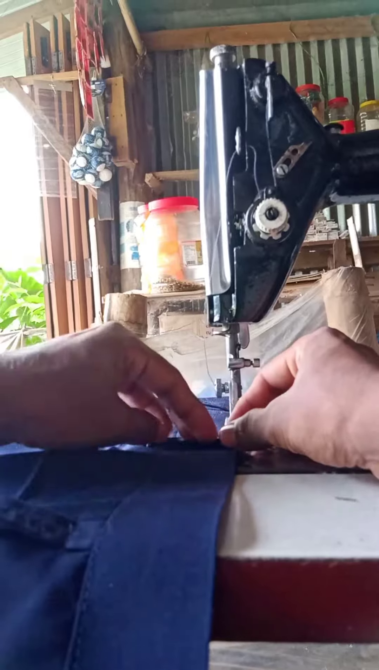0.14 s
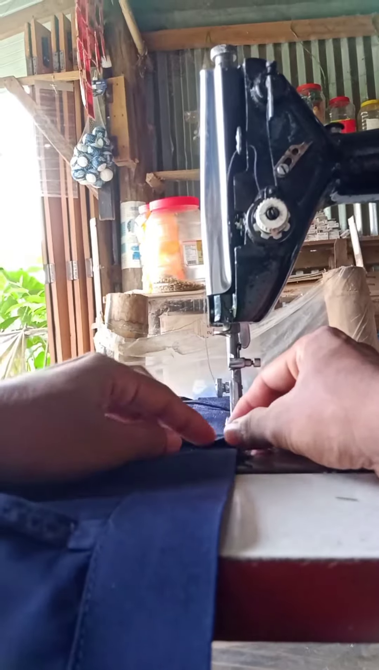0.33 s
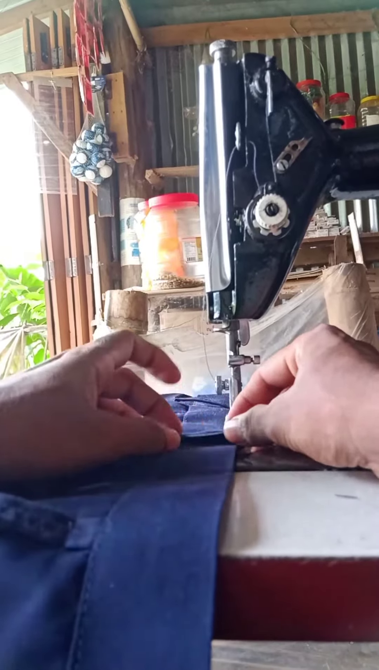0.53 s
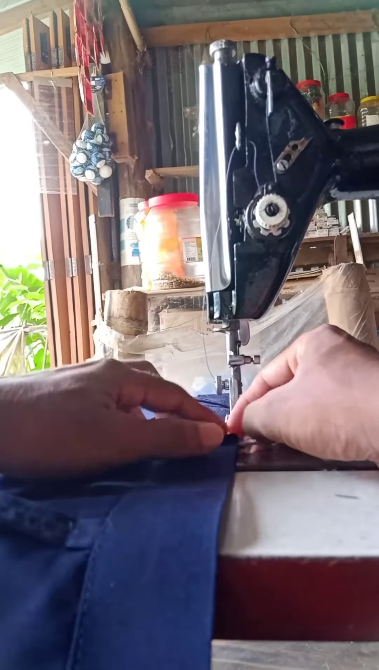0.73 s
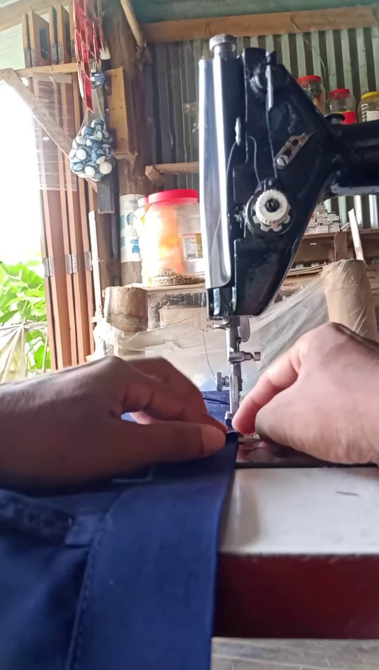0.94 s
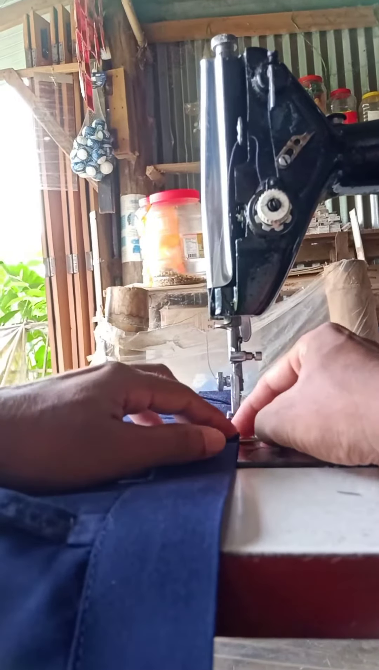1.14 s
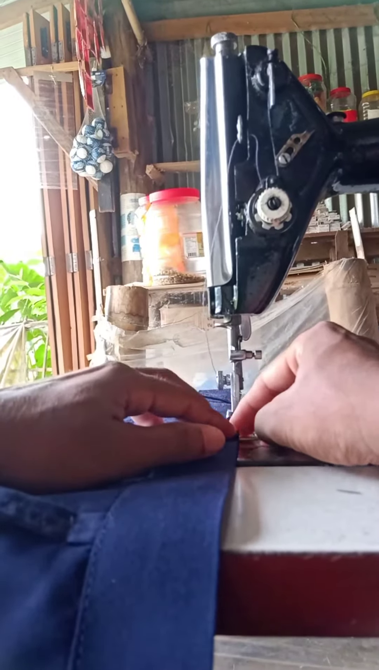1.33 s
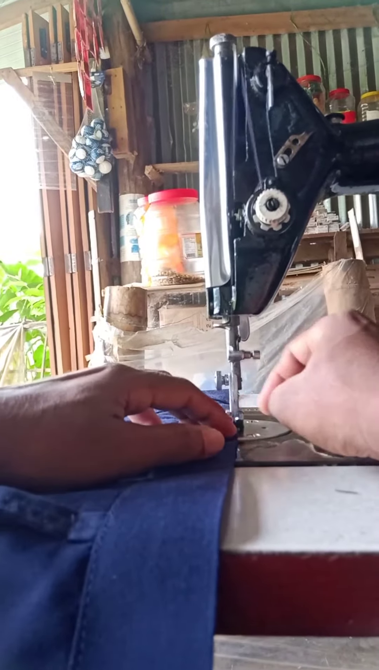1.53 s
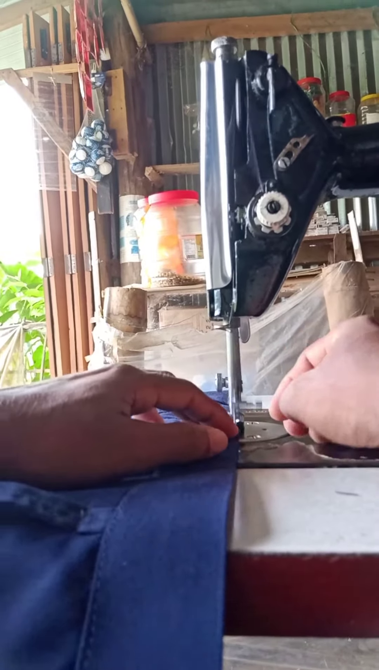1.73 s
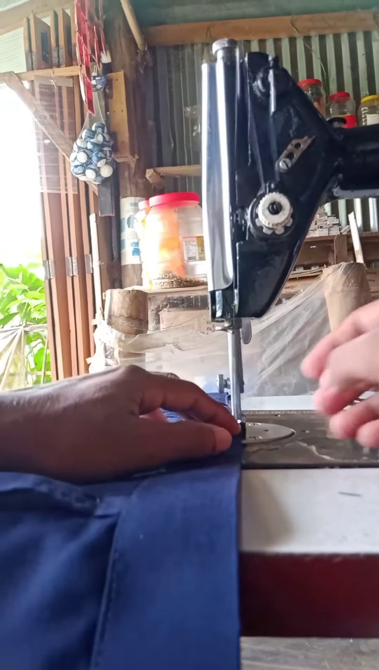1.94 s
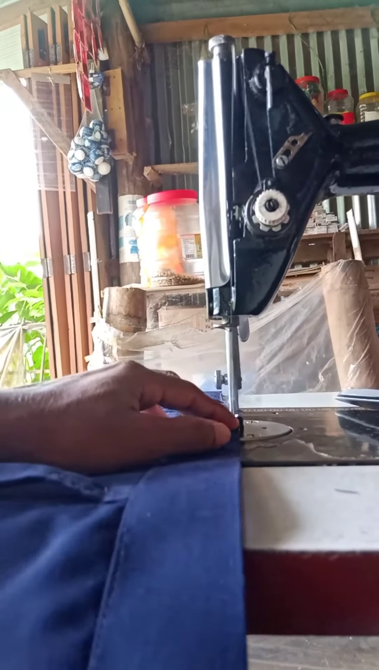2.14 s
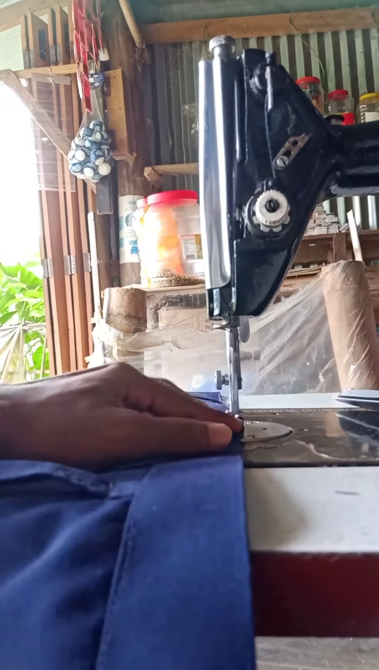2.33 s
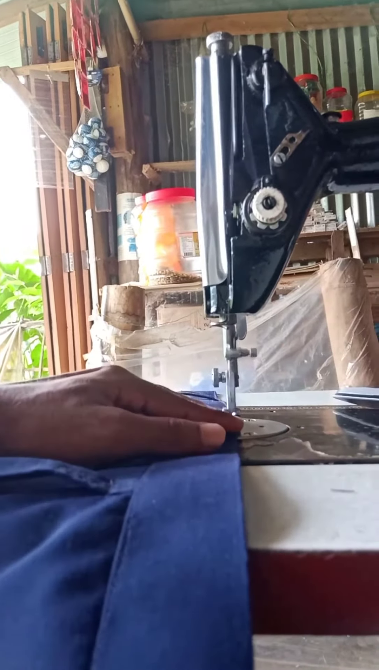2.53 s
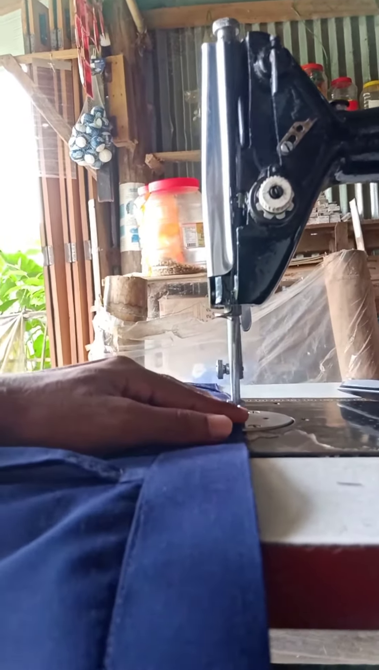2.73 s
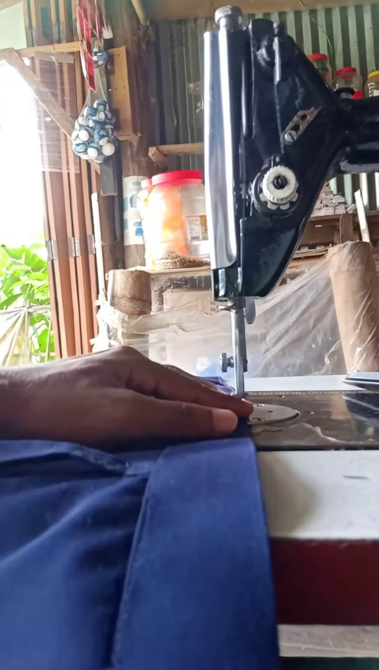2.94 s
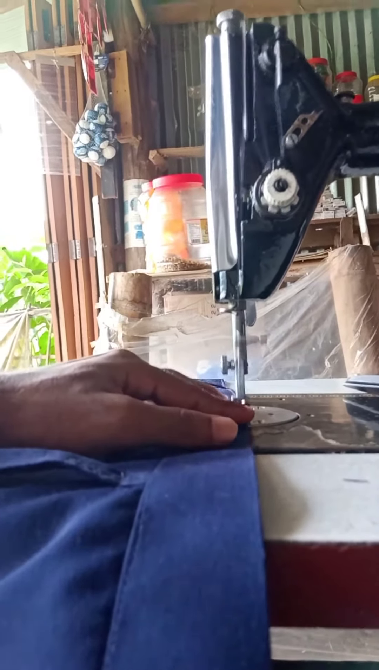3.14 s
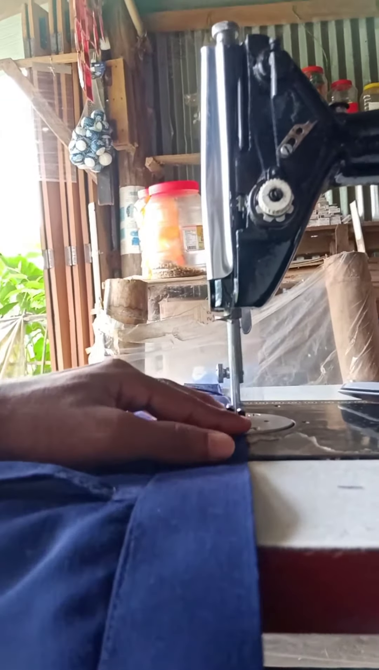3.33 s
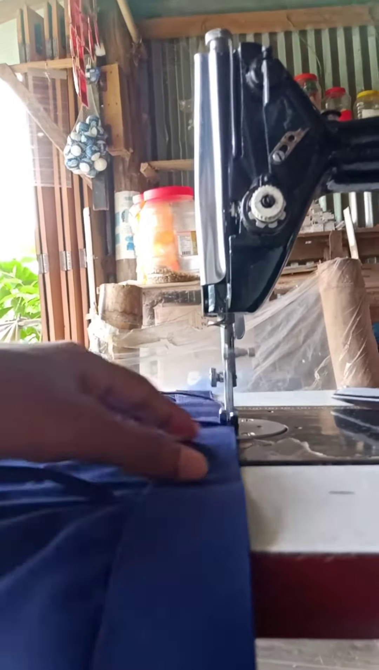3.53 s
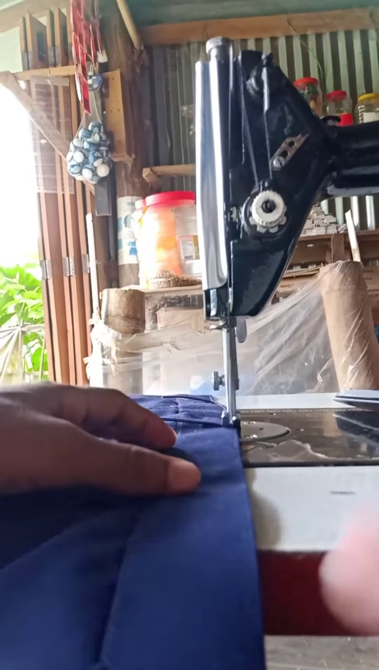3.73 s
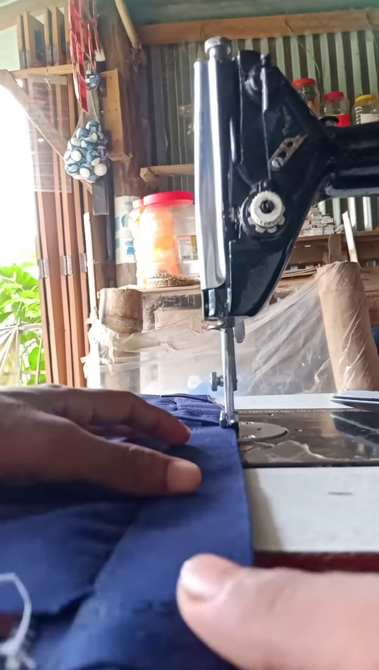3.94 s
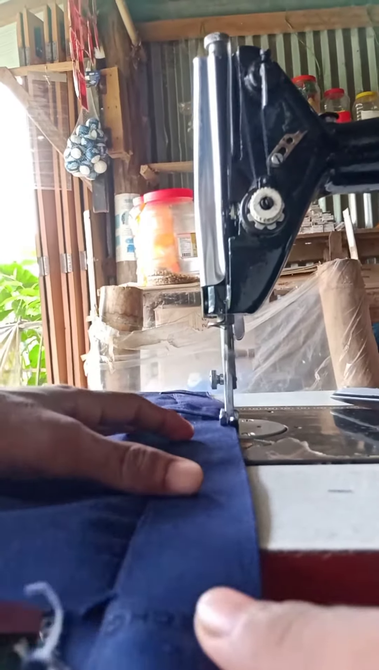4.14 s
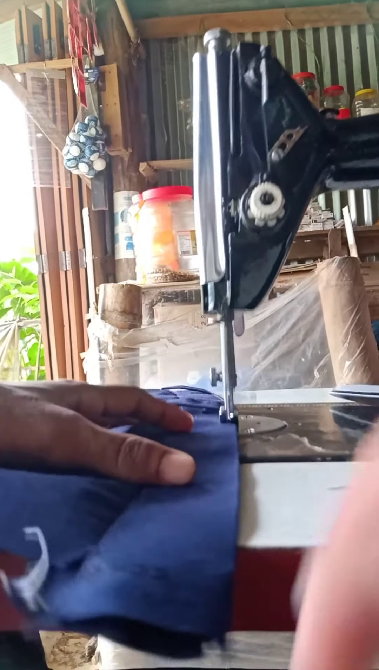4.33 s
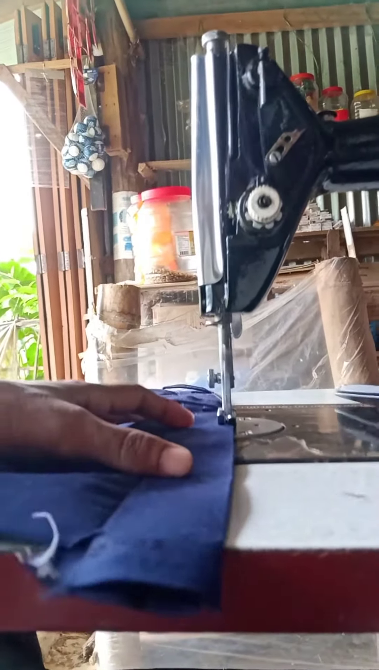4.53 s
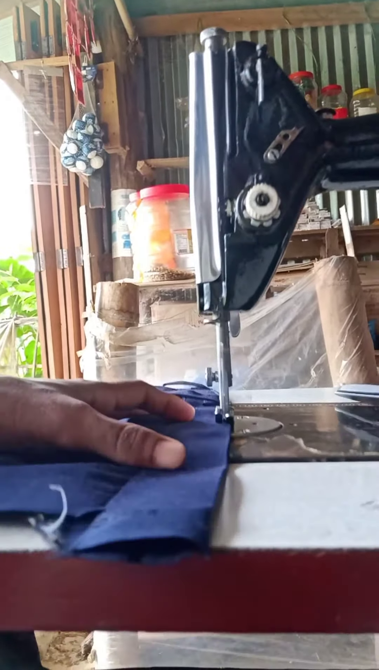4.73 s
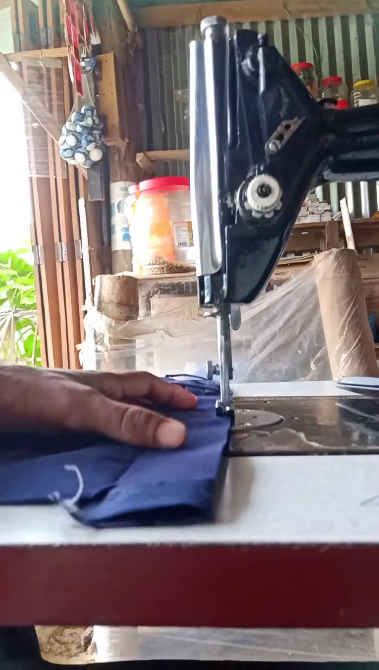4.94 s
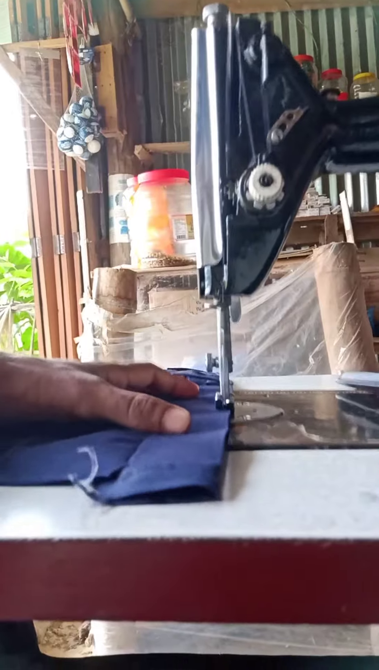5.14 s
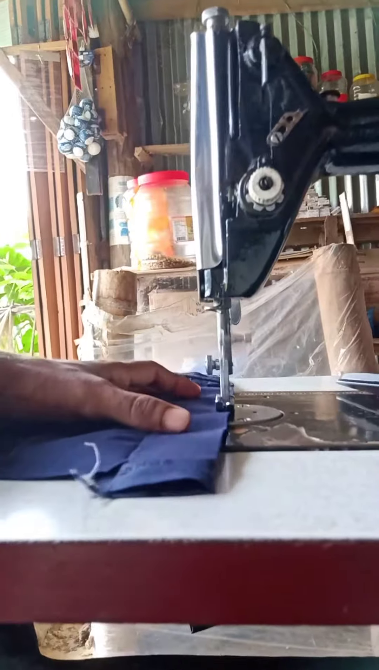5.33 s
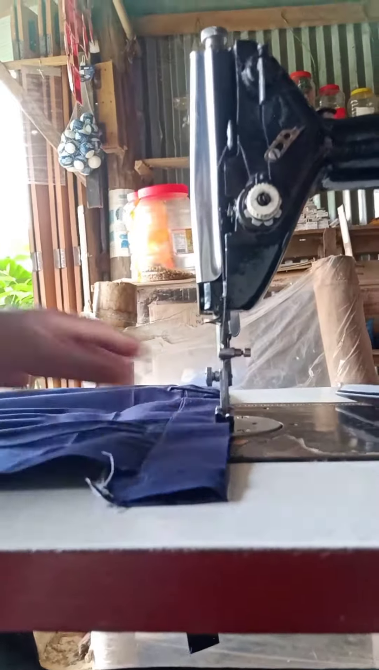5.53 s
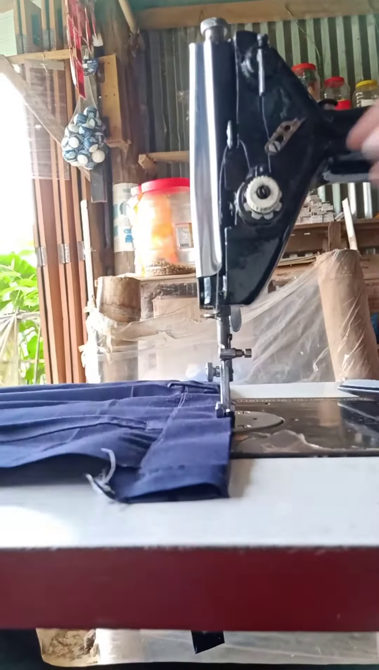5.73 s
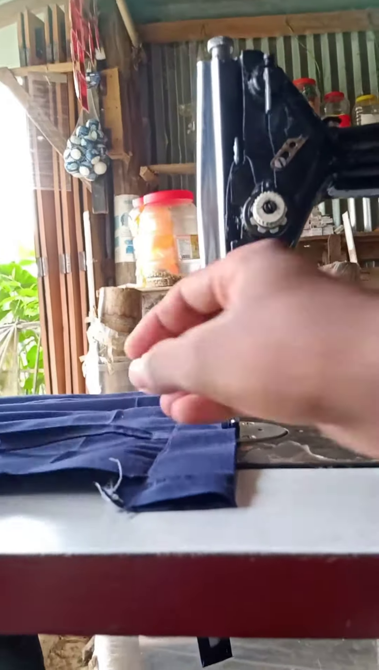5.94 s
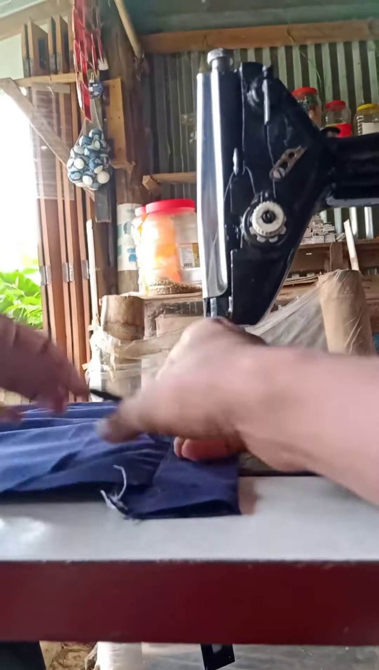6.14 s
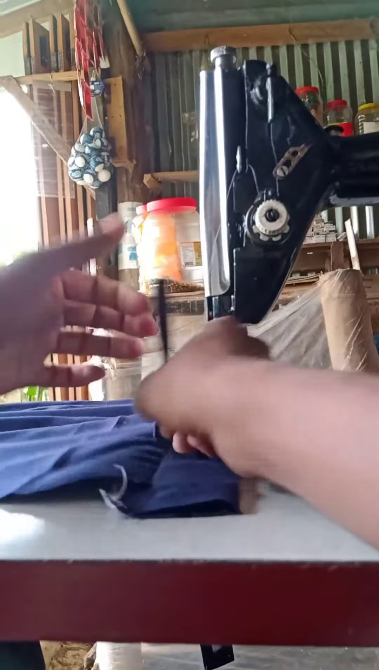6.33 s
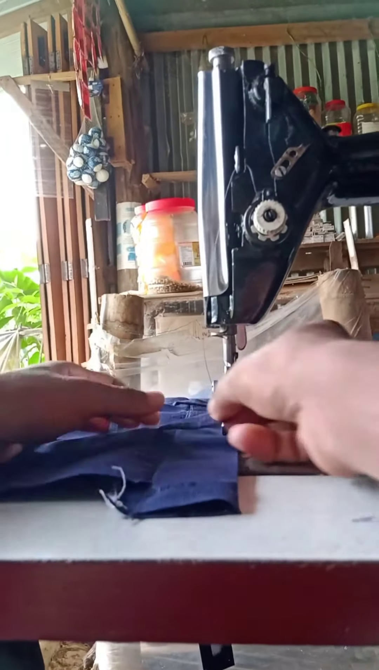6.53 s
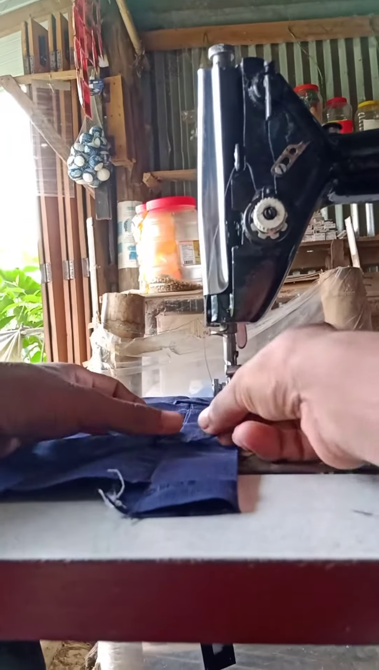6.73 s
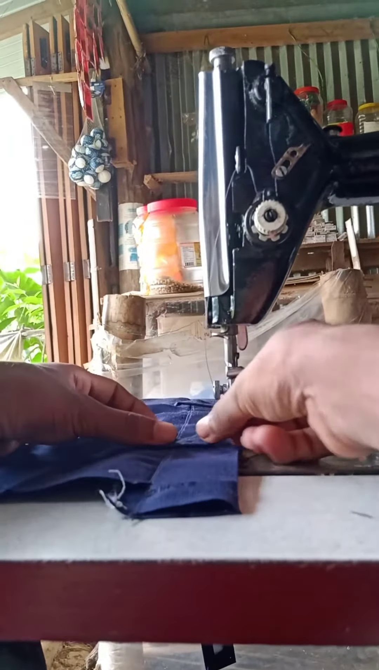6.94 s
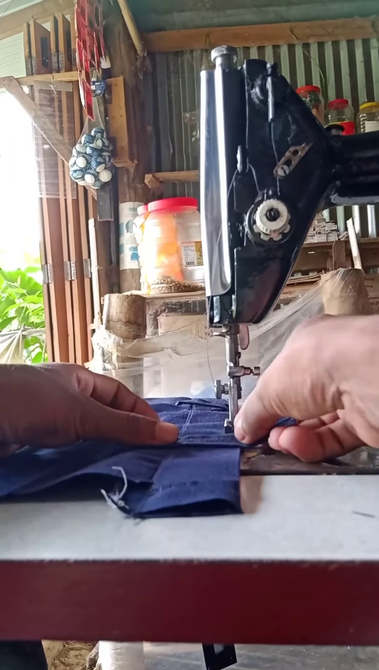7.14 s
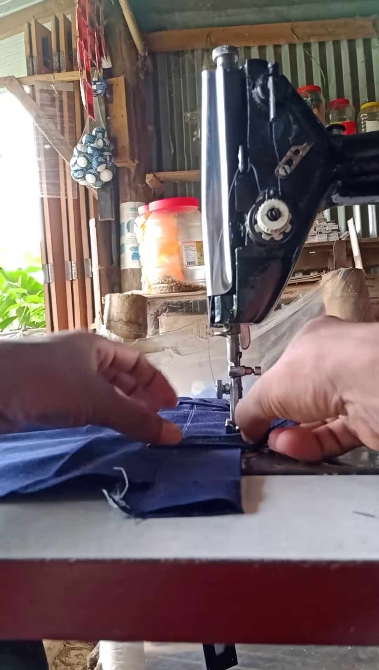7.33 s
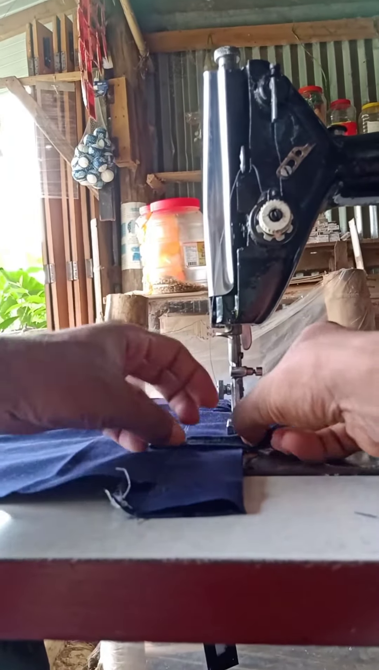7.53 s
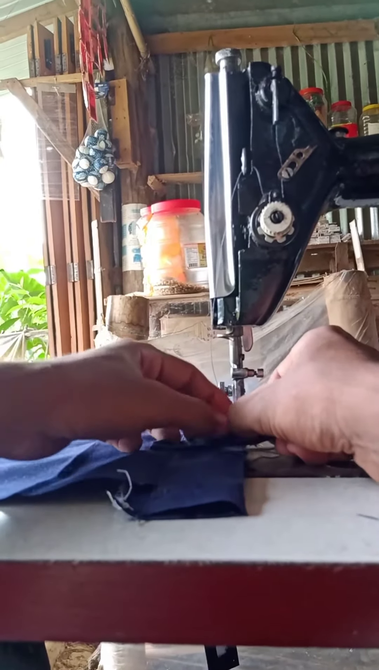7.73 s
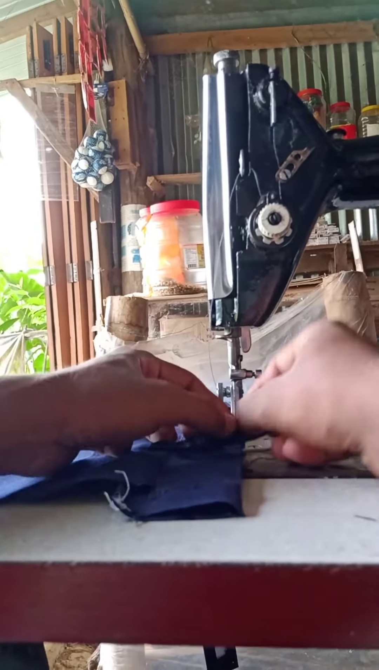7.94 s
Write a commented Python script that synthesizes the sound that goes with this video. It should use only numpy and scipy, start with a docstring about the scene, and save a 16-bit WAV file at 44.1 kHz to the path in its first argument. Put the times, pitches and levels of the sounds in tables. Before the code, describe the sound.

Close microphone beside an old motor-driven sewing machine on a wooden table. Constant wavering fan tone and airy rush come first alone. Then hard metallic clatter, ringing casting, thread ticks and whirring bearings run for four seconds in three speed surges, the belt singing briefly under load. Loud stitching ducks the hum; after the stop it gradually returns. Short, tight room reverberation.

```python
"""Small tin-walled workshop: a motor-driven cast-iron sewing machine on a wooden table, close to the microphone.
A fan hums and rushes steadily, as wavering tones over coloured noise; the machine sews in three surges of speed.
Each turn of the shaft strikes six blows that ring casting, steel and frame; the thread ticks and hisses, bearings whirr.
The belt sings in bending tones under load, and the dry works squeak in rough short notes at the start.
The recorder's gain control pushes loud passages down and lets the sound swell back."""
import sys
import numpy as np
from scipy import signal
from scipy.fft import rfft, irfft
from scipy.io import wavfile
from scipy.ndimage import uniform_filter1d

SR = 44100
rng = np.random.default_rng(int(sys.argv[2]) if len(sys.argv) > 2 else 0)


def generate_wav(signal):
    """Clip the signal to [-1, 1] and save it as 16-bit WAV at the path in sys.argv[1]."""
    frames = np.transpose(np.atleast_2d(signal))
    scaled = np.clip(frames, -1, 1) * 32767
    pcm = np.round(scaled).astype(np.int16)
    wavfile.write(sys.argv[1], SR, pcm)


N = 351918
TIME = np.arange(N) / SR
SHORT_TIME = TIME[:SR // 2]  # the half second given to every decay


def undb(db):
    """Turn decibels into gain."""
    return 10 ** (np.asarray(db) / 20)


def unit(x):
    """Scale to rms 1."""
    return x / np.sqrt(np.mean(x ** 2))


def filter_unit_energy(x, response):
    """Convolve with a response scaled to unit energy."""
    return signal.fftconvolve(x, response / np.linalg.norm(response))[:N]


def colour(x, points):
    """Minimum-phase filter of unit energy whose spectrum follows (Hz, dB) points."""
    hz, db = np.transpose(points)
    size = 8192
    grid = np.maximum(np.fft.rfftfreq(size, 1 / SR), 1)
    gain = undb(np.interp(np.log(grid), np.log(hz), db))
    # folding the cepstrum forward in time makes the filter causal
    cepstrum = irfft(np.log(gain))
    cepstrum[1:size // 2] *= 2
    cepstrum[size // 2 + 1:] = 0
    return filter_unit_energy(x, irfft(np.exp(rfft(cepstrum))))


def walk(rate):
    """Smooth random wander of rms 1; a higher rate wanders faster."""
    width = int(SR / rate)
    steps = rng.standard_normal(N // 20)[np.arange(N) // max(width, 20)]
    return unit(uniform_filter1d(uniform_filter1d(steps, width), width))


def fade(t60):
    """Half a second of exponential decay, 60 dB down after t60 seconds."""
    return np.exp(-np.log(1000) * SHORT_TIME / t60)


def ring(x, modes):
    """Struck parts ring as a sum of decaying sines, scaled to unit energy."""
    response = np.zeros(len(SHORT_TIME))
    for k, (hz, t60, db) in enumerate(modes):
        sign = (-1) ** k  # neighbouring modes move in opposite directions
        response += sign * undb(db) * fade(t60) * np.sin(2 * np.pi * hz * SHORT_TIME)
    return filter_unit_energy(x, response)


def blows(times, db):
    """One impulse of the given size at each time."""
    samples = np.clip(times * SR, 0, N - 1).astype(int)
    return np.bincount(samples.ravel(), undb(db).ravel(), N)


def push(x, length_s):
    """Spread each blow over a soft contact."""
    size = int(length_s * SR) | 1
    window = np.hanning(size)
    return signal.fftconvolve(x, window / window.sum(), "same")


def chatter(x, t60, rise_s):
    """Each blow breaks up into a burst of tiny random contacts that builds and fades."""
    power = (fade(t60) * (1 - np.exp(-SHORT_TIME / rise_s))) ** 2
    burst_power = signal.fftconvolve(x ** 2, power / power.sum())[:N]
    return np.sqrt(np.abs(burst_power)) * rng.standard_normal(N)


def swell(start, length):
    """A rounded rise and fall."""
    return np.sin(np.pi * np.clip((TIME - start) / length, 0, 1))


def tone(hz):
    """A sine of rms 1 that follows a pitch curve from a random phase."""
    return np.sqrt(2) * np.sin(2 * np.pi * (np.cumsum(hz) / SR + rng.random()))


# Tones of the fan motor. Each row: pitch in Hz, rms level in dB, unsteadiness (a relative amount).
FAN_TONES = [(86, -53, 0.5), (96, -47.5, 6.5), (301, -42.5, 0), (509.5, -53, 4.5), (564, -47, 4.5),
             (594, -50.5, 0.5), (599.3, -23, 0.94), (625.5, -38, 1.06), (669, -53.5, 0), (865, -49.5, 4.5),
             (889, -44, 4), (958, -48, 2.5), (1680, -53, 3.5), (1730, -46.5, 5.5)]
# Rush of air from the fan. Each row: frequency in Hz, relative level in dB.
FAN_AIR = [(25, -22.5), (50, -2.5), (90, 5), (150, 4), (230, -3), (400, 4.5), (950, 4), (1300, -0.5),
           (1720, 0.5), (1900, -3.5), (3300, -14), (4300, -31), (5500, -53.5), (15000, -58)]


def fan(air_db=-34.0, drift=.0003, flutter_hz=1.0, waver_db=0.63):
    """Motor tones waver in level and pitch, each by its own unsteadiness, over rushing air."""
    hum = np.zeros(N)
    for hz, db, unsteadiness in FAN_TONES:
        level = undb(db + waver_db * unsteadiness * walk(22))
        pitch = hz * (1 + drift * walk(2)) + flutter_hz * unsteadiness * walk(25)
        hum += level * tone(pitch)
    air = colour(rng.standard_normal(N), FAN_AIR)
    return hum + undb(air_db + 0.53 * walk(14)) * air


# Speed of the shaft, one stitch a turn, in three surges from rest to rest.
# Each row: time in seconds, speed in turns a second.
SHAFT_SPEED = [(1.56, 0), (1.64, 12.0), (1.83, 16.05), (2.13, 14.94), (2.46, 11.4), (2.73, 7.69),
               (2.96, 15.1), (3.16, 21.31), (3.59, 15.68), (3.85, 13.36), (3.94, 10.8), (4.22, 18.06),
               (4.59, 23.5), (4.94, 31.72), (5.35, 21.75), (5.46, 16.32), (5.63, 0)]
CRUISE_HZ = 18  # turns a second at which the blows have their listed strength


def shaft():
    """The motor turns the shaft; its speed glides between the listed points."""
    return np.interp(TIME, *np.transpose(SHAFT_SPEED))


# How hard the works are driven, apart from their speed.
# Each row: time in seconds, knock level in dB, click level in dB.
DRIVE_LOAD = [(1.56, -17, -24), (1.66, -9.5, -13.5), (1.85, -3.5, 1.5), (2.11, -4.5, -1.5), (2.5, 2, -1),
              (2.95, -3, -1), (3.25, 3, 4), (3.85, -3.5, -1), (4.14, -3.5, -4.5), (4.31, 1.5, 5),
              (4.45, 6, 5.5), (4.8, 4.5, 2), (5.0, 0, -0.5), (5.36, 3, -5.5), (5.48, -1, -0.5),
              (5.561, -11, -15)]


def load(times):
    """Extra strength of the knocks and of the clicks at these times, in dB."""
    load_s, knock_db, click_db = np.transpose(DRIVE_LOAD)
    return np.interp(times, load_s, knock_db), np.interp(times, load_s, click_db)


# Blows of needle bar, feed and shuttle within one turn. Each row: share of the turn, knock level in dB,
# click level in dB, click gain in dB per doubling of speed.
CAM_BLOWS = [(.02, 2, 2.5, 2.5), (.13, 6, -8.5, 16), (0.299, 0, -2.5, 22), (.61, 2, 3.5, 5.5),
             (0.719, 1.5, -7, 7), (.84, 1, 1.5, 5)]


def strikes(slop_s=0.00069):
    """Times of every cam blow, and the shaft speed in doublings above cruising; one row a stitch."""
    rate = shaft()
    # the shaft starts half a turn before the needle lands
    turns = np.cumsum(rate) / SR - .5
    stitches = np.arange(int(turns[-1]))[:, None]
    times = np.interp(stitches + np.transpose(CAM_BLOWS)[0], turns, TIME)
    speed = np.log2(np.maximum(np.interp(times, TIME, rate), 1) / CRUISE_HZ)
    return times + slop_s * rng.standard_normal(times.shape), speed


# Single blows as loose joints catch and settle.
# Each row: time in seconds, knock level in dB, click level in dB.
LOOSE_BLOWS = [(1.55, -17.5, -16.5), (1.589, -16.5, -28.5), (1.651, -1, -2), (2.053, -1, 6), (2.328, 3, 2),
               (2.407, 2.5, -1.5), (3.09, 4, 7.5), (3.694, 5, -1.5), (4.17, 0.5, 2.5), (4.409, 15.5, 2),
               (4.594, 6.5, 1.5), (5.329, 5.5, 7.5), (5.633, -16, -6)]
# Modes of table top and casting. Each row: pitch in Hz, decay time t60 in seconds, relative level in dB.
BODY_MODES = [(214, .06, -11.5), (307.7, 0.12, 3.5), (317, 0.046, 4), (342.2, 0.21, -2), (444, 0.11, -1.5),
              (482.5, 0.14, -1.5), (624, 0.095, -4.5), (731, 0.068, 2), (896, 0.023, 6.5),
              (1094, 0.073, -2), (1179, 0.085, 1.5), (1278, 0.013, 9)]
# Rattle of the loose joints after a knock. Each row: frequency in Hz, relative level in dB.
JOINT_RATTLE = [(50, -41), (110, -13), (180, -9.5), (300, -2.5), (390, -5.5), (480, 1.5), (580, -3.5),
                (750, -2), (1150, -3), (1500, -8), (2500, -14.5), (4000, -32), (5500, -66)]


def casting(times, speed, knock_db=18.0, speed_db=5.0, scatter_db=1, modes_db=-7.0, rattle_db=-3.0):
    """Cam knocks, harder the faster the shaft spins, ring table and casting and rattle the joints."""
    lone_s, lone_db, _ = np.transpose(LOOSE_BLOWS)
    scatter = scatter_db * rng.standard_normal(times.shape)
    strength = load(times)[0] + np.transpose(CAM_BLOWS)[1] + speed_db * speed + scatter
    knocks = undb(knock_db) * (blows(times, strength) + blows(lone_s, lone_db))
    body = ring(push(knocks, .0004), BODY_MODES)
    rattle = colour(chatter(knocks, t60=0.076, rise_s=.004), JOINT_RATTLE)
    return undb(modes_db) * body + undb(rattle_db) * rattle


# Modes of the steel linkage. Each row: pitch in Hz, decay time t60 in seconds, relative level in dB.
STEEL_MODES = [(1323, 0.035, -4), (1776, 0.056, 7), (2000, 0.047, -0.5), (2286, 0.043, 0.5),
               (2390, 0.04, 4.5), (2950, 0.014, -14.5), (3330, 0.077, -11.5), (3370, 0.027, -3.5),
               (4100, .04, -18.5)]
# Scrape of steel on steel in a click. Each row: frequency in Hz, relative level in dB.
STEEL_SCRAPE = [(200, -21.5), (700, 7), (1200, -2.5), (2300, -1), (3400, -4.5), (4200, -15), (5400, -39),
                (7300, -35), (9000, -45), (10000, -48), (15500, -67)]


def linkage(times, speed, click_db=6.5, scatter_db=1, play_db=2, steel_db=-5, scrape_db=-1):
    """Cam clicks, harder with speed, break into tiny contacts that ring the steel and scrape."""
    _, _, cam_db, speed_db = np.transpose(CAM_BLOWS)
    lone_s, _, lone_db = np.transpose(LOOSE_BLOWS)
    scatter = scatter_db * rng.standard_normal(times.shape)
    # below cruising speed the joints have time to fall slack, and some blows catch harder
    catch = play_db * rng.exponential(size=times.shape) * (speed < 0)
    strength = load(times)[1] + cam_db + speed_db * speed + scatter + catch
    clicks = undb(click_db) * (blows(times, strength) + blows(lone_s, lone_db))
    contact = chatter(clicks, t60=0.017, rise_s=0.0022)
    steel = ring(push(contact, .0002), STEEL_MODES)
    return undb(steel_db) * steel + undb(scrape_db) * colour(contact, STEEL_SCRAPE)


# Thread snapping through its guides. Each row: frequency in Hz, relative level in dB.
THREAD_SNAP = [(2500, -6.5), (4500, 6), (5700, -7.5), (7300, -3.5), (8400, -3), (9000, -2), (10000, -23.5),
               (11900, -13), (12400, -10.5), (13500, -12), (15500, -19.5)]


def thread(times, speed, db=-21.5, speed_db=0.5, scatter_db=4, lone_db=-24, hiss_db=-60):
    """The thread ticks in its guides at each jerk of the works and hisses as it runs in between."""
    jerk = (load(times)[1] + np.transpose(CAM_BLOWS)[2]) / 2
    scatter = scatter_db * rng.standard_normal(times.shape)
    lone_s, _, lone_click = np.transpose(LOOSE_BLOWS)
    ticks = blows(times, db + speed_db * speed + jerk + scatter) + blows(lone_s, lone_db + lone_click)
    hiss_level = undb(hiss_db + load(TIME)[1] / 2 + 2.5 * walk(110)) * np.sqrt(shaft() / CRUISE_HZ)
    hiss = hiss_level * rng.standard_normal(N)
    return colour(chatter(ticks, t60=0.07, rise_s=.004) + hiss, THREAD_SNAP)


def bearings(whirr_db=-23, slide_db=-33, growth=0.36):
    """Between the blows the bearings whirr and the bars slide, louder with speed and load."""
    knock_load, click_load = load(TIME)
    whirr_level = undb(whirr_db + knock_load / 2 + 2 * walk(77))
    slide_level = undb(slide_db + click_load / 2 + 3.1 * walk(150))
    whirr = whirr_level * colour(rng.standard_normal(N), JOINT_RATTLE)
    slide = slide_level * colour(rng.standard_normal(N), STEEL_SCRAPE)
    return (shaft() / CRUISE_HZ) ** growth * (whirr + slide)


# Low modes of the table frame. Each row: pitch in Hz, decay time t60 in seconds, relative level in dB.
FRAME_MODES = [(90.4, 0.26, 4), (162.8, 0.24, -2.5), (221, 0.36, 0.5)]
# Lone thumps of the frame as the drive takes hold, the table jolts or a hand lands.
# Each row: time in seconds, level in dB.
LONE_THUMPS = [(1.566, -2), (1.61, 1), (1.862, 11.5), (3.088, 12.5), (3.29, 19), (3.63, 14), (4.2, 14),
               (5.308, 8), (6.156, -9)]
# the needle punches through a thick fold of cloth between these times, in seconds
FOLD_START_S, FOLD_END_S = 2.3, 2.86


def frame_thumps(times, speed, punch_db=1, slow_punch_db=4, fold_db=10):
    """The needle's punch rings the frame at each stitch, harder when slow and in thick cloth."""
    needle_s = times[:, 0]
    in_fold = (needle_s > FOLD_START_S) & (needle_s < FOLD_END_S)
    strength = punch_db - slow_punch_db * speed[:, 0] + fold_db * in_fold
    punches = blows(needle_s, strength) + blows(*np.transpose(LONE_THUMPS))
    # slow flexing moves little air, so the thump has no deep bass
    bass_cut = signal.butter(2, 80, "high", fs=SR, output="sos")
    return signal.sosfilt(bass_cut, ring(push(punches, .002), FRAME_MODES))


def frame_hum(resonance_hz=116, width_hz=20, shake_db=-18):
    """At speed the unbalanced crank shakes the frame into a hum that glides through its resonance."""
    rate = shaft()
    hum = np.zeros(N)
    for multiple in range(3, 8):
        hz = multiple * rate
        hum += tone(hz) / np.hypot(1, (hz - resonance_hz) / width_hz)
    return undb(shake_db) * (rate / rate.max()) ** 3 * hum


# The belt sings on its pulley under load. Each row: start in seconds, length in seconds,
# pitch at the start in Hz, pitch at the end in Hz, level in dB.
BELT_NOTES = [(1.577, 0.26, 948, 945, -17.5), (1.671, .13, 720, 772, -16), (1.69, .22, 911, 1043, -11.5),
              (2.835, 0.32, 884, 1003, -13.5), (4.09, 0.2, 915, 975, -9), (4.171, .36, 830, 608, -12.5),
              (4.288, 0.51, 1100, 1102, -5.5)]


def belt():
    """The slipping belt sings a rough note that bends as the wheel catches up."""
    out = np.zeros(N)
    for start, length, first_hz, last_hz, db in BELT_NOTES:
        hz = np.interp(TIME, [start, start + length], [first_hz, last_hz])
        slip = 1 + .04 * walk(300)
        out += undb(db + 1.7 * walk(90)) * swell(start, length) * tone(hz * slip)
    return out


# Dry squeaks as the works start. Each row: start in seconds, length in seconds, pitch in Hz, level in dB.
DRY_SQUEAKS = [(1.633, .018, 6500, -43.5), (1.641, 0.066, 5280, -42), (1.714, 0.14, 6600, -48.5),
               (1.768, 0.036, 4340, -26), (1.855, 0.021, 4300, -29), (1.875, 0.044, 6050, -41.5),
               (1.942, 0.013, 4270, -25.5)]


def squeaks(roughness=0.083):
    """Stick-slip in the dry works makes short notes, scratchy from a fast random wander of pitch."""
    waver = 1 + roughness * walk(1600)
    out = np.zeros(N)
    for start, length, hz, db in DRY_SQUEAKS:
        out += undb(db) * swell(start, length) * tone(hz * waver)
    return out


def workshop(x, wet_db=-13):
    """Short reverberation between tin walls: a decaying noise tail after a 6 ms gap."""
    tail = rng.standard_normal(SR // 2) * fade(.25) * (SHORT_TIME > .006)
    return x + undb(wet_db) * filter_unit_energy(x, tail)


def scene():
    """The machine sounds through the workshop's reverberation; the fan is added dry."""
    times, speed = strikes()
    sewing = casting(times, speed) + linkage(times, speed) + thread(times, speed) + bearings()
    sewing += frame_thumps(times, speed) + frame_hum() + belt() + squeaks()
    return (workshop(sewing) + fan())[None]


def gain_control(x, threshold_db=-17.0, slope=0.9, release_db=15, sense_s=0.039):
    """Loud passages pull the gain down quickly; it creeps back at release_db a second."""
    width = int(sense_s * SR)
    power = np.abs(uniform_filter1d(np.mean(x ** 2, axis=0), width))
    level_db = 10 * np.log10(power + 1e-12)
    wanted = slope * np.maximum(level_db - threshold_db, 0)
    held = np.maximum.accumulate(wanted + release_db * TIME) - release_db * TIME
    return x * undb(-uniform_filter1d(held, width))


def record(dry):
    """The small microphone loses the deep bass; gain control follows; the top is cut."""
    bass_cut = signal.butter(3, 52, "high", fs=SR, output="sos")
    top_cut = signal.ellip(8, .2, 70, 15400, fs=SR, output="sos")
    return signal.sosfilt(top_cut, gain_control(signal.sosfilt(bass_cut, dry)))


dry = scene()
out = record(dry)
generate_wav(out)
```